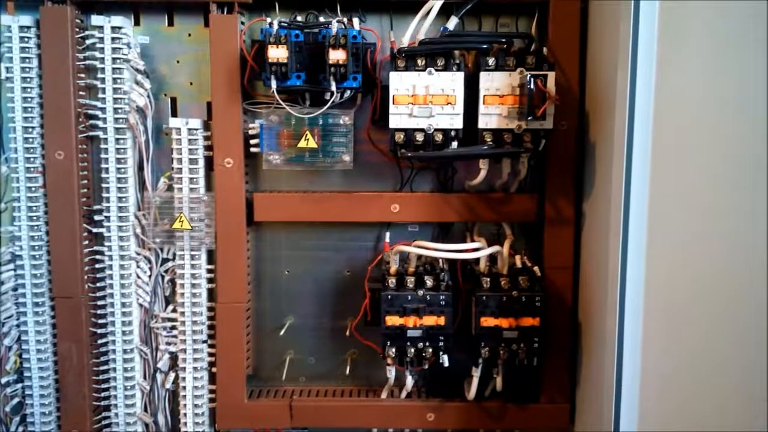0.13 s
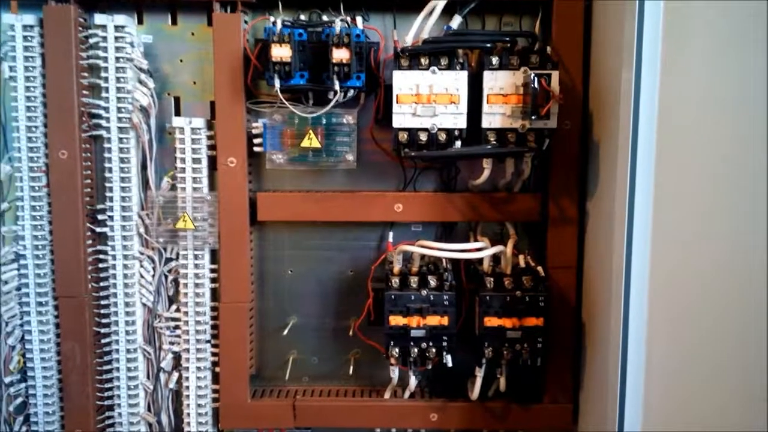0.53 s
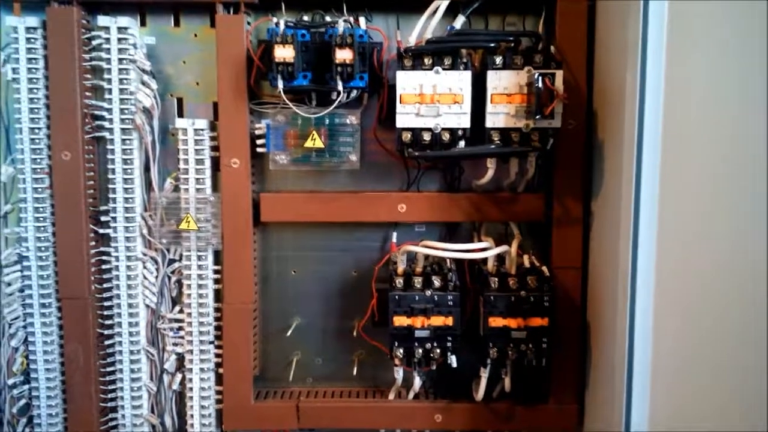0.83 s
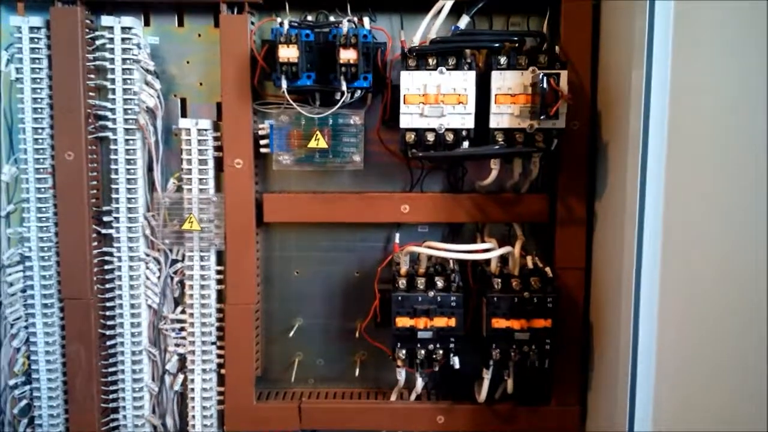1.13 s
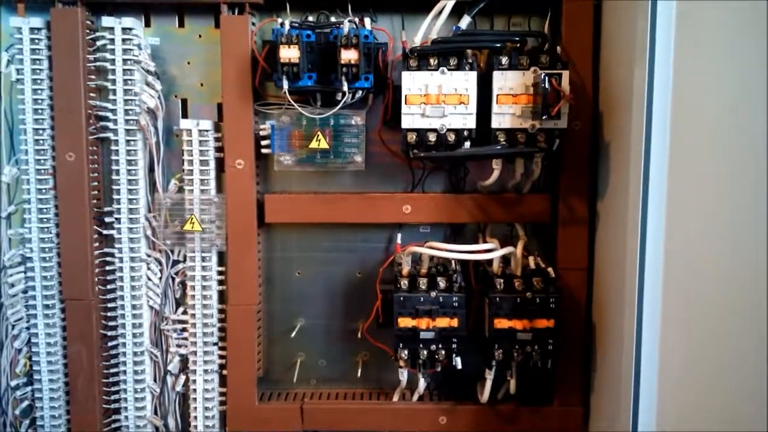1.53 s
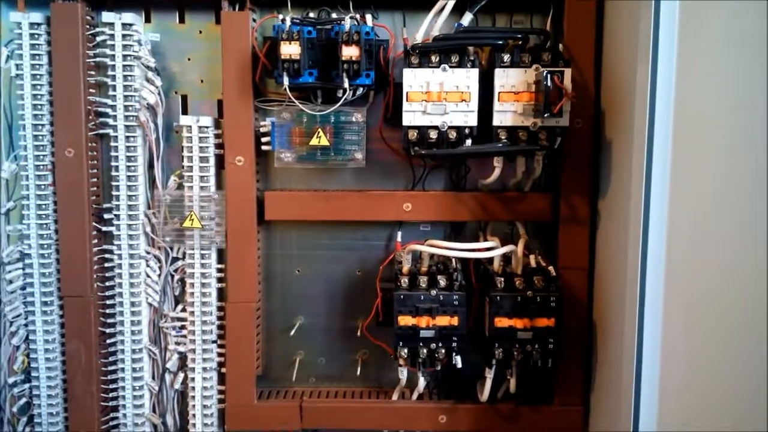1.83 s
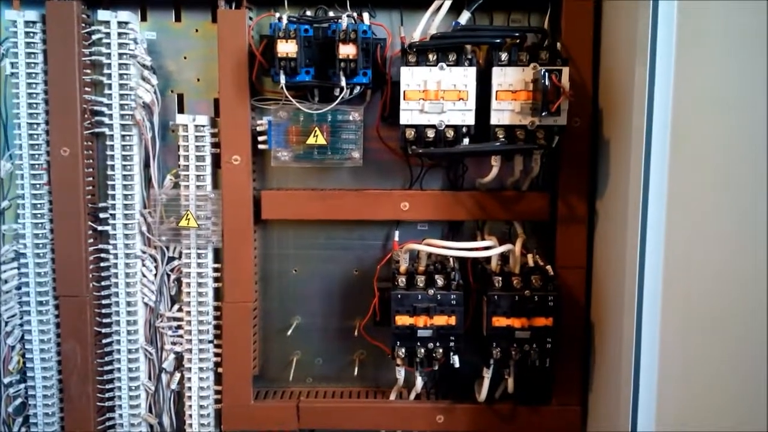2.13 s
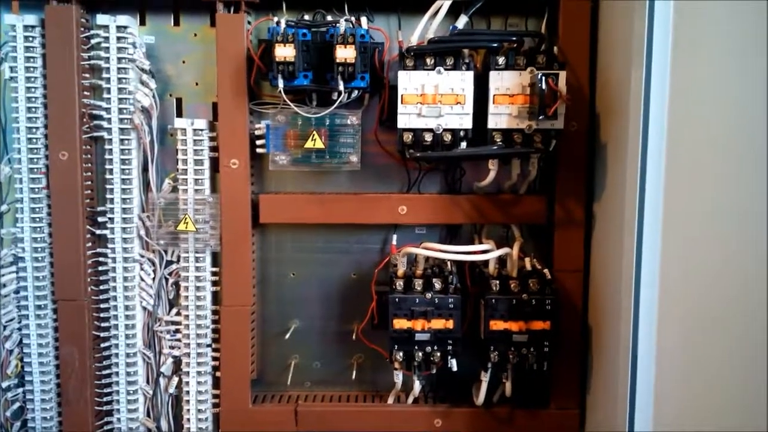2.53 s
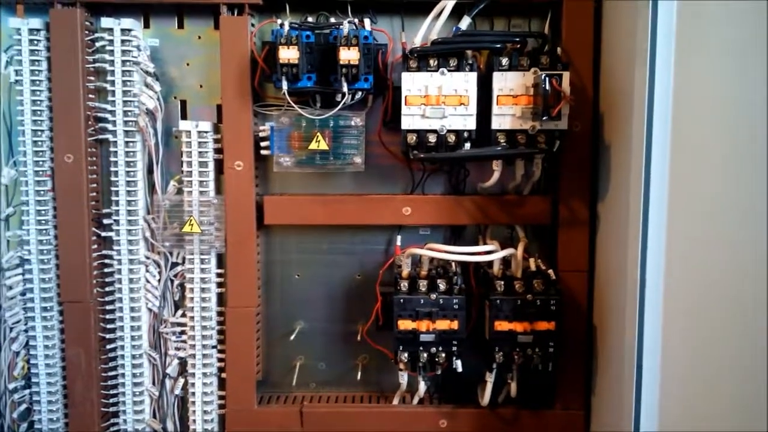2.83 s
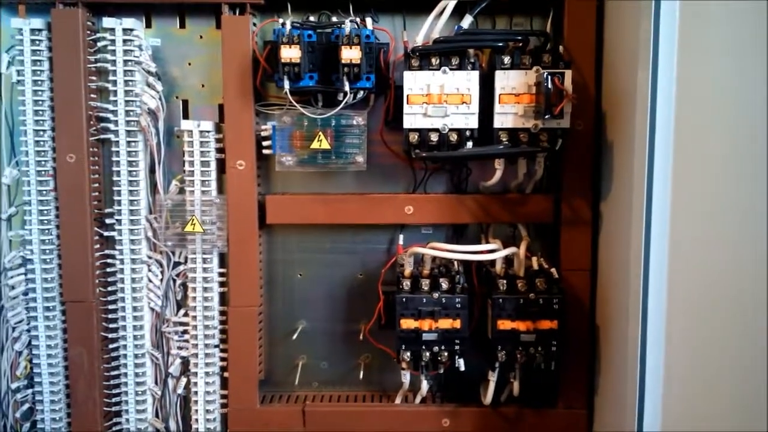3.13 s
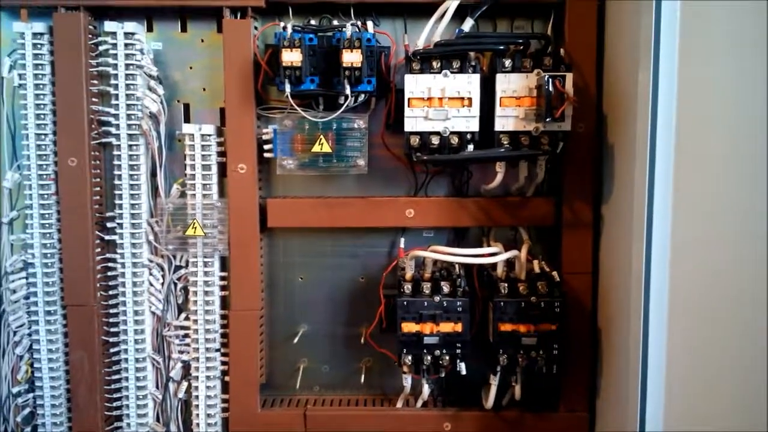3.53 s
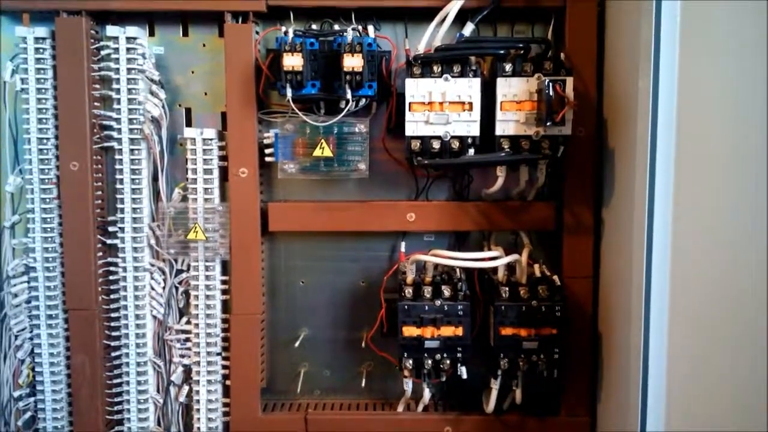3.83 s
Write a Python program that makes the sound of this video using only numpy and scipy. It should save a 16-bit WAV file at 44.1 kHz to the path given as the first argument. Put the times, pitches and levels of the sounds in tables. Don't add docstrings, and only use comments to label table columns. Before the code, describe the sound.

A relay snaps, then a heavier contactor slams and bounces in an open steel cabinet; a brake rattles and a hoist motor starts, close microphone in an echoing concrete machine room.

```python
import sys
import numpy as np
from scipy import signal
from scipy.fft import rfft, irfft, next_fast_len
from scipy.io import wavfile
from scipy.ndimage import uniform_filter1d

SR = 44100
rng = np.random.default_rng(int(sys.argv[2]) if len(sys.argv) > 2 else 0)


def inscribe(sig):
    pcm = np.round(np.clip(np.atleast_2d(sig).T, -1, 1) * 32767)
    wavfile.write(sys.argv[1], SR, pcm.astype(np.int16))


def magnitude_from_level(level_db):
    exponent = np.asarray(level_db, float) / 20
    return 10 ** exponent


N = 176400


def level(x, db):
    return x * magnitude_from_level(db) / np.sqrt(np.mean(x ** 2))


def colour(x, tone):
    points = np.array(tone, float)
    size = next_fast_len(len(x))
    hz = np.arange(size // 2 + 1) * SR / size + 1
    gain = magnitude_from_level(np.interp(np.log(hz), np.log(points[:, 0]), points[:, 1]))
    return irfft(rfft(x, size) * gain, size)[:len(x)]


def noise(tone, size=N):
    return level(colour(rng.standard_normal(size), tone), 0)


def walk(rate_hz):
    span = int(SR / rate_hz)
    drift = uniform_filter1d(uniform_filter1d(rng.standard_normal(N), span), span)
    return (drift - drift.mean()) / drift.std()


def ring(push, modes):
    out = 0
    for hz, db, t60 in modes:
        radius = np.exp(-np.log(1000) / (max(t60, .003) * SR))
        angle = 2 * np.pi * hz / SR
        feedback = [1, -2 * radius * np.cos(angle), radius ** 2]
        out = out + signal.lfilter([0, magnitude_from_level(db) * radius * np.sin(angle)], feedback, push)
    return out


def struck(rows, t):
    out = 0
    for start, db, hz, t60 in rows:
        age = np.clip(t - start, 0, 1)
        decay = magnitude_from_level(db - 60 * age / max(t60, .003)) * (age < 1)
        out = out + decay * np.sin(2 * np.pi * hz * age)
    return out


# f/Hz, level/dB per Hz
EARLIER_TONE = [(76, -40), (130, -9), (273, -8.5), (741, -25), (2500, -39), (4500, -45), (5300, -45),
                (15500, -63)]


def earlier_tail(t):
    start_db, t60_s = -45.5, 2.44
    return noise(EARLIER_TONE) * magnitude_from_level(start_db - 60 * t / t60_s)


# t/s, level/dB
HUM_SWELL = [(0.0, -35.5), (0.27, -32.5), (0.85, -48), (0.95, -40.5), (1.02, -50.5), (1.18, -36),
             (1.68, -37), (1.73, -48), (1.89, -32.5), (2.16, -36), (2.35, -33), (3.22, -33.5), (3.27, -40),
             (3.36, -38.5), (3.74, -40.5), (3.77, -49), (3.95, -29.5), (4.0, -38)]
# t/s, depth/dB, half width/s
HUM_DIPS = [
    (.06, -7, 0.019),
    (.23, -7, 0.014),
    (.375, -8, 0.016),
    (.5, -7, 0.022),
    (.7, -8, 0.02),
    (1.42, -11, 0.013),
    (1.47, -18, 0.01),
]
# f/Hz, level/dB per Hz
AIR_TONE = [(40, -14), (90, -12.5), (170, -12), (380, -14.5), (650, -30), (1100, -38), (4000, -47.5),
            (15800, -66.5)]


def fan(t):
    hum_hz, shaft_hz = 114, 69.4
    swell = np.array(HUM_SWELL)
    dips = sum(db * np.exp(-((t - s) / width) ** 2) for s, db, width in HUM_DIPS)
    hum_db = np.interp(t, swell[:, 0], swell[:, 1]) + 1.57 * walk(25) + dips
    phase = 2 * np.pi * np.cumsum(hum_hz + 0.66 * walk(4.9)) / SR
    hum = np.sqrt(2) * magnitude_from_level(hum_db) * np.sin(phase)
    skirt = level(ring(rng.standard_normal(N), [(122.0, 0, 1.9 / 27)]), -49.5)
    shaft = np.sqrt(2) * magnitude_from_level(-48 + .7 * walk(3)) * np.sin(2 * np.pi * shaft_hz * t)
    air = noise(AIR_TONE) * magnitude_from_level(-47.5 + 1.03 * walk(1.1))
    return hum + skirt + shaft + air


# t/s, level/dB, whine f/Hz
MOTOR_RUN = [
    (3.418, -26, 380),
    (3.459, -31, 389),
    (3.6, -32.5, 410),
    (3.719, -30.5, 422.6),
    (3.8, -28, 442.2),
    (3.86, -26.5, 455.5),
    (3.92, -27.5, 475.4),
    (4.0, -27.5, 491),
]
# f/Hz, level/dB per Hz
MOTOR_TONE = [(30, -37), (110, -36), (280, -2), (500, -12), (620, -17.5), (2000, -33.5), (7000, -33),
              (15800, -50)]
# f/Hz, width/Hz, level/dB
FRAME = [(35.3, 4, -4), (166, 12, -8), (194.2, 15, 8), (276, 8.7, -0.5), (340, 34, 1.5), (390, 64, -34),
         (1520, 640, -1.5)]


def motor(t):
    run = np.array(MOTOR_RUN)
    modes = [(hz, db + 10 * np.log10(width), 3.0 / width) for hz, width, db in FRAME]
    frame = level(ring(rng.standard_normal(N), modes), -3.5)
    rumble = (noise(MOTOR_TONE) + frame) * magnitude_from_level(0.5 * walk(41))
    whine_db = -7 + 72 * np.minimum(t - 3.92, 0) + 3.9 * walk(24)
    phase = 2 * np.pi * np.cumsum(np.interp(t, run[:, 0], run[:, 2])) / SR
    whine = np.sqrt(2) * magnitude_from_level(whine_db) * np.sin(phase)
    return magnitude_from_level(np.interp(t, run[:, 0], run[:, 1], left=-120)) * (rumble + whine)


# t/s, level/dB, f/Hz, t60/s
KNOCKS = [(3.75, -21.5, 193.7, 0.26), (3.786, -27, 197, 0.25), (3.819, -23, 333, 0.025),
          (3.84, -18, 266, 0.04), (3.864, -19, 336, 0.025), (3.887, -18, 283, 0.085),
          (3.906, -20, 302, .05), (3.931, -18, 303, 0.032), (3.957, -15, 334, .03), (3.967, -22, 284, .04),
          (3.98, -28, 257, 0.038), (3.993, -31, 278, 0.037)]


def gear_knocks(t):
    return struck(KNOCKS, t)


# f/Hz, level/dB
ROOM_TONE = [(200, 11), (1000, 0.84), (3000, -3), (7000, -2.5), (9300, 0), (11300, -6.5), (12500, 3),
             (15500, -9)]


def room(force, diffuse):
    build_s, wall_s = 0.0036, .027
    room_t60_s, air_loss_hz, air_loss_power = 1.83, 9400, 1.79
    cabinet_db, cabinet_t60_s = 8, 0.11
    length = len(force)
    size = next_fast_len(length)
    spectrum = rfft(colour(diffuse, ROOM_TONE), size)
    f = np.arange(size // 2 + 1) * SR / size + 1

    def fade(energy, t60_s):
        return signal.lfilter([1], [1, -(1e-6 ** (1 / SR / t60_s))], energy)

    lag = np.exp(-1 / (build_s * SR))
    energy = signal.lfilter([(1 - lag) * 20 / SR], [1, -lag], force ** 2)
    early = magnitude_from_level(2 * cabinet_db) * fade(energy, cabinet_t60_s)
    energy = energy + np.pad(energy, (int(wall_s * SR), 0))[:length]
    tail = 0
    for hz in 125 * 2 ** np.arange(0, 7.3, .25):
        weight = np.clip(1 - 4 * np.abs(np.log2(f / hz)), 0, 1)
        band = irfft(spectrum * weight, size)[:length]
        t60_s = 1 / (1 / room_t60_s + (hz / air_loss_hz) ** air_loss_power)
        tail = tail + band * np.sqrt(early + fade(energy, t60_s))
    return tail


def blows(rows, t, col):
    force = 0
    for row in rows:
        age = np.clip(t - row[0], 0, 1) / (row[2] / 1000)
        force = force + magnitude_from_level(row[col]) * np.exp(-age) * (1 - np.exp(-8 * age))
    return force


def clack(t, rows, tone, modes, body, ring_db, tail_ring_db, tail_db):
    t = t[int(10 * rows[0][0]) * SR // 10:]
    size = len(t)
    force = blows(rows, t, col=1)
    crack = force * noise(tone, size=size)
    parts = ring(force * rng.standard_normal(size), modes)
    parts = parts * magnitude_from_level(ring_db) * crack.std() / parts.std()
    diffuse = noise(tone, size=size) + level(ring(rng.standard_normal(size), modes), tail_ring_db)
    diffuse = diffuse * magnitude_from_level(0.5 * walk(90)[:size])
    tail = magnitude_from_level(tail_db) * room(force, diffuse)
    push = np.diff(blows(rows, t, col=3), prepend=0)
    thump = colour(ring(push, body), [(90, -20), (165, 0)])
    return np.pad(crack + parts + tail + thump, (N - size, 0))


# t/s, level/dB, f/Hz, t60/s
PINGS = [(2.4585, -41.5, 1700, .015), (3.479, -16, 1590, 0.045), (3.493, -22, 1690, .05),
         (3.523, -19, 1663, .06), (3.532, -19, 1335, .06), (3.586, -20, 1647, 0.03),
         (3.592, -21, 1290, 0.061), (2.4682, -16, 4110, 0.017), (2.4688, -15, 8600, .008),
         (2.47, -15, 10300, .006), (2.4702, -10.5, 5200, .01), (2.498, -24, 8200, .01),
         (3.322, -22, 10300, .01), (3.3262, -8, 5760, .008), (3.3285, -18, 10400, 0.0075),
         (3.3288, -17, 6950, 0.0053), (3.3368, -17, 10700, .008), (3.3372, -9.5, 3000, 0.0069),
         (3.3385, -13, 8250, 0.0062), (3.4775, -25, 5640, .01), (3.4815, -23, 5800, 0.0073),
         (3.5155, -20, 5860, .01)]


def small_parts(t):
    return struck(PINGS, t)


# t/s, level/dB, contact/ms, low thud level/dB
BRAKE_BLOWS = [(3.474, -14, 2.8, -24.5), (3.4768, -15, 2.6, -37), (3.481, -13, 3.8, -35),
               (3.487, -16, 3.4, -29.5), (3.492, -17, 2.2, -38), (3.497, -14, 5.2, -34),
               (3.505, -16.5, 4.5, -36), (3.512, -23, 4.4, -42), (3.518, -20.5, 5.6, -47),
               (3.525, -22, 5.9, -37), (3.537, -26, 5, -39), (3.549, -30, 6, -22), (3.571, -37, 5, -31),
               (3.586, -23, 4.4, -37), (3.613, -37, 8, -40), (3.66, -38, 26, -37), (3.715, -38, 42, -28),
               (3.74, -39.5, 46, -33), (3.79, -45, 46, -40), (3.87, -46, 79, -40)]
# f/Hz, level/dB per Hz
BRAKE_TONE = [(180, -34), (350, -14.5), (750, -11.5), (1600, -8), (3800, -14.5), (6000, -12), (9500, -9.5),
              (15800, -14.5)]
# f/Hz, level/dB, t60/s
BRAKE_RING = [(885, -8, .06), (1340, -7, .05), (1500, -3, .03), (1610, 1, .04), (1700, -2, .035),
              (3310, -11, .07), (5780, 3, .025), (5950, 2, .025), (6100, -2, .015), (6900, -8, .02),
              (8050, -3, .012), (9432, 0, .045), (9400, 5, .008), (9950, -7, .02)]
# f/Hz, level/dB, t60/s
BRAKE_THUD = [(255, 0.5, 0.4), (344, 5, 0.13), (453, -16, 0.19), (597, -11, 0.5)]


def brake(t):
    return clack(t, BRAKE_BLOWS, BRAKE_TONE, BRAKE_RING, BRAKE_THUD,
                 ring_db=-3.5, tail_ring_db=-3.5, tail_db=-1)


# t/s, level/dB, contact/ms, panel thump level/dB
RELAY_BLOWS = [
    (2.4597, -32, 33, -62.5),
    (2.4676, -22.5, 2.6, -47),
    (2.4697, -17, 2.2, -21.5),
    (2.469, -12, 1.5, -48),
    (2.473, -21.5, 2, -44),
    (2.498, -26, 4, -50),
]
# f/Hz, level/dB per Hz
RELAY_TONE = [(250, -9), (500, -14.5), (1000, -14.5), (2500, -8), (4200, -6.5), (7000, -5), (10500, -4.5),
              (15800, -12.5)]
# f/Hz, level/dB, t60/s
RELAY_RING = [(2000, 0, .02), (2800, 1, .025), (4150, 6, .007), (5100, 3, .008), (5780, 4, .015),
              (8900, 5, .006), (10200, 4, .006)]
# f/Hz, level/dB, t60/s
RELAY_PANEL = [(195.3, -2.5, 0.68), (256, -14, 0.42), (275, -13.5, 0.9), (378, -4, 0.13), (415, -14, 0.8),
               (468, -12, 0.8), (670, -19, .3)]


def relay(t):
    return clack(t, RELAY_BLOWS, RELAY_TONE, RELAY_RING, RELAY_PANEL,
                 ring_db=-7.5, tail_ring_db=-9.5, tail_db=-3)


# t/s, level/dB, contact/ms, unused/dB
ARMATURE = [
    (3.301, -26.5, 6.3, 0),
    (3.315, -15, 2.9, 0),
]
# f/Hz, level/dB, t60/s
ARMATURE_RING = [(1559, 2, 0.068), (1500, -18, .02)]


def armature_chirp(t):
    scrape = blows(ARMATURE, t, col=1) * rng.standard_normal(N)
    return 0.045 * ring(scrape, ARMATURE_RING)


# t/s, level/dB, contact/ms, panel thump level/dB
CONTACTOR_BLOWS = [
    (3.298, -38.5, 39, -55),
    (3.309, -44, 5, -50),
    (3.317, -36, 2.8, -34),
    (3.322, -15.5, 3.3, -47),
    (3.327, -11.5, 1.65, -22.5),
    (3.3279, -8, 2.5, -27),
    (3.3369, -12.5, 1.74, -23),
    (3.3384, -10.5, 1.5, -57),
    (3.342, -36, 1.6, -23),
]
# f/Hz, level/dB per Hz
CONTACTOR_TONE = [(250, -8.5), (500, -13.5), (1000, -11), (2600, -1), (4500, -6), (7500, -4.5),
                  (10500, -2.5), (15800, -7)]
# f/Hz, level/dB, t60/s
CONTACTOR_RING = [(1580, -5.5, 0.084), (2490, -3, 0.032), (3280, -3.5, 0.084), (6070, 1, 0.018),
                  (7450, -6, .01), (8270, 10, 0.009), (10000, -7, 0.02)]
# f/Hz, level/dB, t60/s
CONTACTOR_PANEL = [(194.5, 1, 0.67), (181, -10, 1), (240, -28, 0.63), (289, -15, 0.64), (357.4, -6, .4),
                   (410, -11, 0.47), (474, -8.5, 0.53), (748, -8, 0.12), (900, 0.5, 0.086)]


def contactor(t):
    return clack(t, CONTACTOR_BLOWS, CONTACTOR_TONE, CONTACTOR_RING, CONTACTOR_PANEL,
                 ring_db=-11, tail_ring_db=-12, tail_db=-1)


def scene():
    t = np.arange(N) / SR
    background = earlier_tail(t) + fan(t)
    hoist = motor(t) + gear_knocks(t) + brake(t)
    cabinet = relay(t) + armature_chirp(t) + contactor(t) + small_parts(t)
    return (background + hoist + cabinet)[None]


def roll_off(x):
    return signal.sosfilt(signal.butter(12, 16000, fs=SR, output="sos"), x)


# f/Hz, level/dB
MIC_TONE = [(20, -46), (35, -8.5), (50, -23), (64, -0.14), (11000, -0.02), (12000, -12), (15700, -8),
            (15900, -66)]
# f/Hz, level/dB per Hz
HISS_TONE = [(500, -22), (2000, -4.5), (8000, 1), (15700, -1.5), (15900, -51)]
# f/Hz, level/dB
TOP_TONE = [(15750, 0), (15950, -45)]


def record(dry):
    mic = colour(dry[0], MIC_TONE) + magnitude_from_level(-69) * noise(HISS_TONE)
    overloaded = np.tanh(1.057 * mic) / 1.143
    mix = colour(overloaded, TOP_TONE)[None]
    return roll_off(mix)


dry = scene()
out = record(dry)
inscribe(out)
```